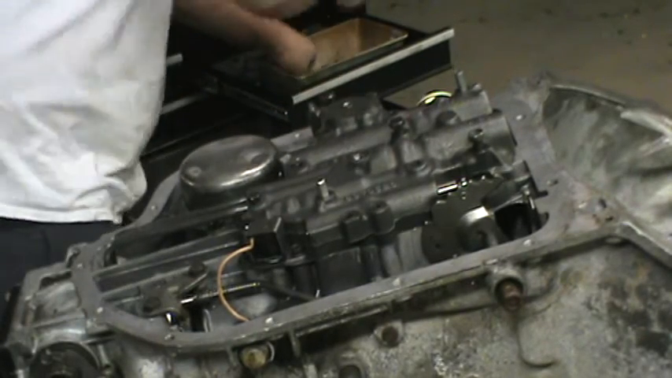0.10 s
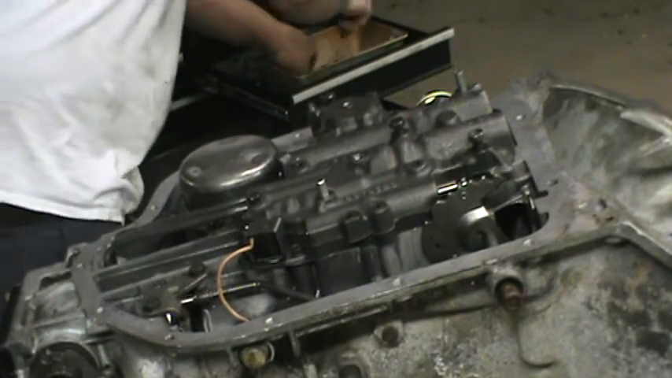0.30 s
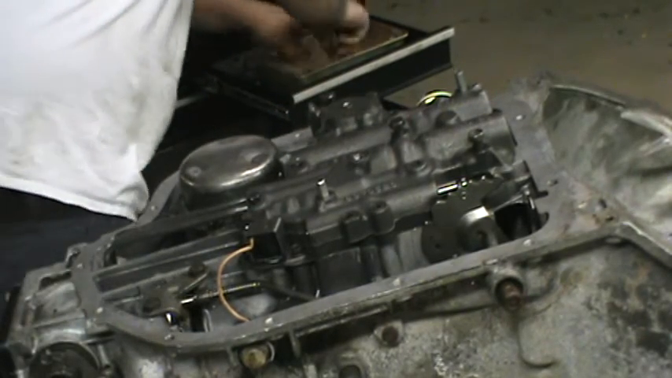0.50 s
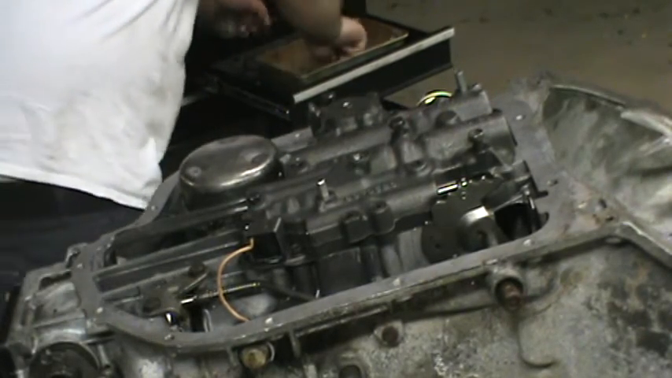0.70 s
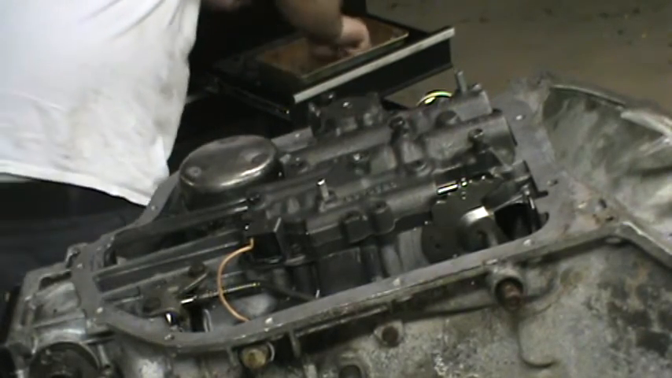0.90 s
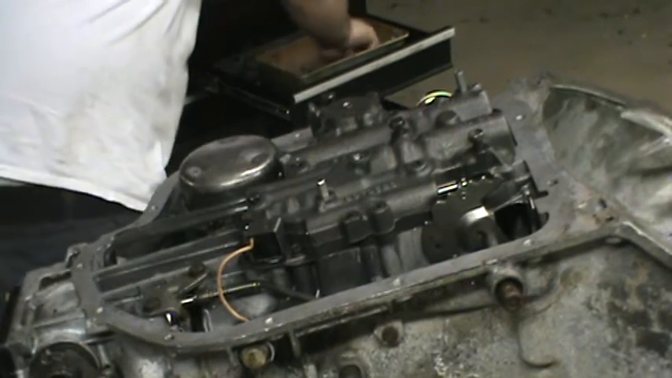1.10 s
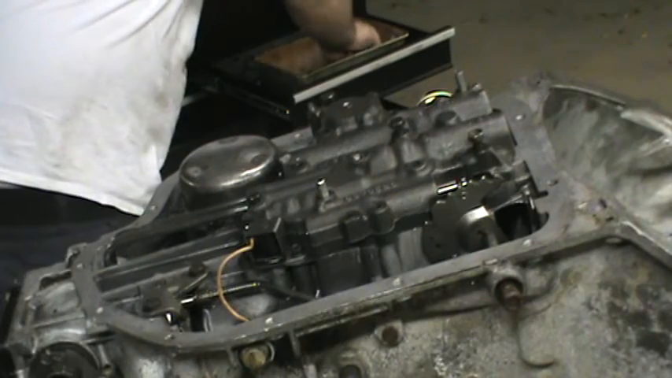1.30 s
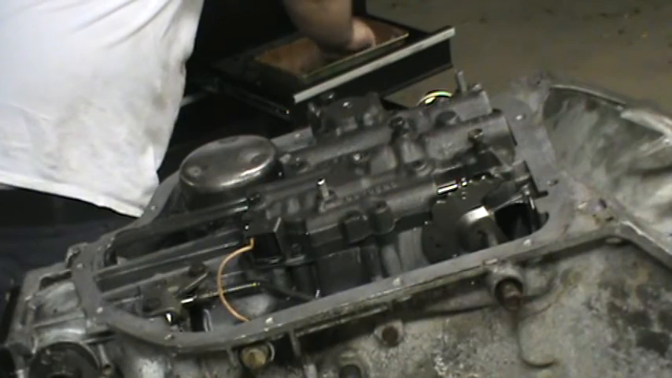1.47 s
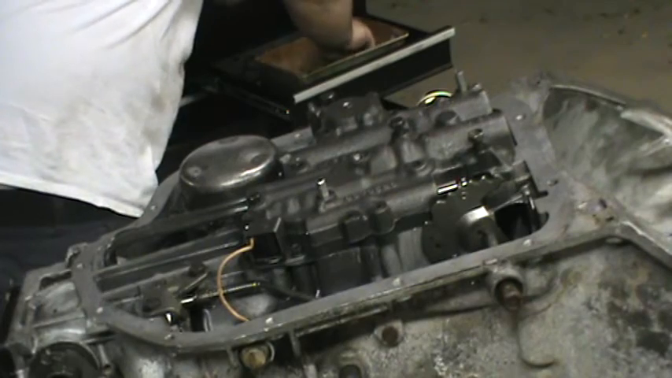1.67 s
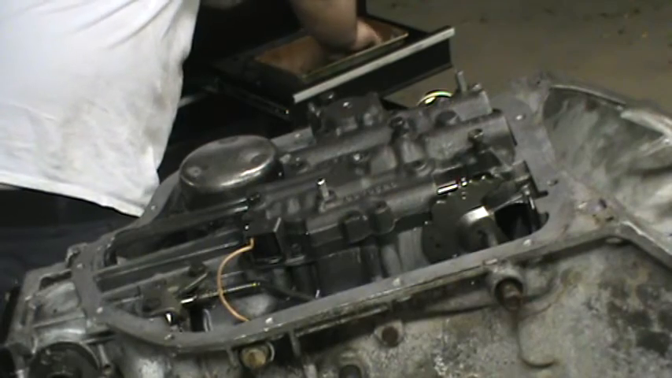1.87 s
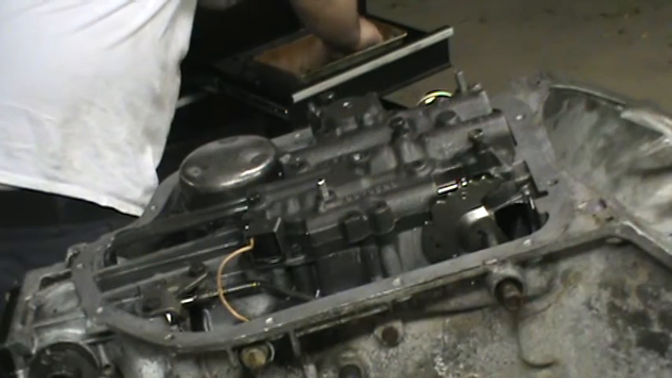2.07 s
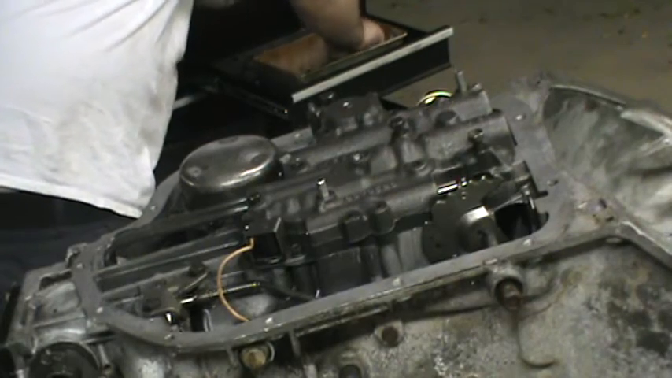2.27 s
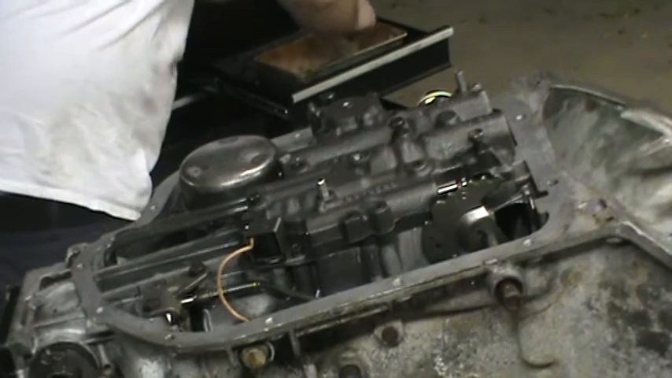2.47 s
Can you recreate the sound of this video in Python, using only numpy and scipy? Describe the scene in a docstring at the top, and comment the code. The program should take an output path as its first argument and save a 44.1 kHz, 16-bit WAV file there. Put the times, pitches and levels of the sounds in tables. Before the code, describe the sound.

Loose steel bolts stirred by fingers in a thin metal tray: light clinks and a clank first, a brief lull, then sharp knocks and gritty sliding in bursts, in a live workshop, heard fairly close in stereo.

```python
"""Loose steel bolts, rummaged by hand in a tray in a workshop.
Bolts slide as dense ringing grains, ping as beating tones, tick and knock as decaying noise bursts.
Knocks, nudges and sliding drive the tray's resonators; three wall rings are clusters of modes.
A noise-built room response answers, over quiet air noise and a faint electrical whine."""
import sys
import numpy as np
from scipy import signal
from scipy.fft import rfft, irfft
from scipy.io import wavfile

SR = 44100
rng = np.random.default_rng(int(sys.argv[2]) if len(sys.argv) > 2 else 0)


def transcribe(u):
    """Save the signal u as a 16-bit wav file named by the first command-line argument.

    u: samples, shape (n,) or (channels, n), limited to [-1, 1]; the rate is SR.
    q: integer samples, one column per channel.
    """
    v = np.clip(np.atleast_2d(u).T, -1, 1)
    q = np.round(v * 32767).astype(np.int16)
    wavfile.write(sys.argv[1], SR, q)


N = 112455
EDGE_HZ = 16150  # upper band limit


def amp(db):
    """Decibels to gain."""
    return 10 ** (np.asarray(db) / 20)


def unit(x):
    """Scales to rms 1."""
    return x / np.sqrt(np.mean(x ** 2) + 1e-20)


def read(points, hz):
    """Reads a table on a log-frequency axis."""
    f, value = np.transpose(points)
    return np.interp(np.log(hz + 1), np.log(f + 1), value)


def colour(x, points):
    """Filters with a table's spectrum, minimum phase so that nothing sounds early."""
    log_gain = np.log(amp(read(points, abs(np.fft.fftfreq(4096, 1 / SR)))))
    response = np.exp(np.conj(signal.hilbert(log_gain)))
    taps = np.fft.ifft(response).real[:2048]
    return signal.fftconvolve(x, taps)[:len(x)]


def noise(points, size=22050):
    """Coloured noise of rms 1, its level swings evened out by the root of the envelope."""
    coloured = colour(rng.standard_normal(size + 1000), points)
    z = signal.hilbert(coloured)[1000:]  # drop the filter's start
    return unit(z.real / np.sqrt(abs(z) + 1e-12))


def decay(t_s, t60_s):
    """Free decay: 60 dB down at t60_s."""
    return np.exp(-np.log(1000) * t_s / t60_s)


def strike(rise_s, t60_s, size=22050):
    """A short linear rise, then free decay."""
    t = np.arange(size) / SR
    return np.minimum(t / rise_s, 1) * decay(np.maximum(t - rise_s, 0), t60_s)


def add(mix, start_s, sound):
    """Adds a sound at start_s."""
    part = mix[max(round(start_s * SR), 0):][:len(sound)]
    part += sound[:len(part)]


def wobble(per_s, size):
    """Independent random values, per_s a second, joined by lines; rms 1."""
    knots = rng.standard_normal(2000)
    return unit(np.interp(np.arange(size) / SR * per_s, np.arange(len(knots)), knots))


def diffuse(size):
    """White noise at two microphones, nearly mono in the bass."""
    # hz, left-right correlation
    alike = [(80, 1), (170, 0.61), (700, 0.54), (1400, 0.18), (10000, 0.47)]
    a, b = rfft(rng.standard_normal((2, size)))
    same = np.clip(read(alike, np.fft.rfftfreq(size, 1 / SR)), -1, 1)
    return irfft(np.array([a, same * a + np.sqrt(1 - same ** 2) * b]), size)


def grains(per_s, ring_s, lo_hz, hi_hz):
    """Random tiny contacts of uneven size, each ringing briefly at its own pitch; rms 1."""
    spread_db = 3.6
    out = np.zeros(N)
    t = np.arange(0, 10 * ring_s, 1 / SR)
    for when, pitch, chance, turn in rng.random((round(per_s * N / SR), 4)):
        hz = lo_hz + pitch * (hi_hz - lo_hz)
        level_db = spread_db * min(-np.log(1 - chance), 4)
        ring = np.exp(-t / ring_s) * np.sin(2 * np.pi * (hz * t + turn))
        add(out, when * N / SR, amp(level_db) * ring)
    return unit(out)


def sliding():
    """Dense slips and a sparser high rattle follow the fingers' push and bunch as the bolts jostle."""
    # push of the fingers: time_s, level_db
    push = [(0, -51.5), (.09, -58.5), (.15, -66.5), (.21, -63.5), (0.231, -47), (.31, -51), (.39, -47),
            (.47, -57), (.65, -61), (0.699, -39), (.73, -45), (.80, -42.5), (.86, -39.5), (.93, -44),
            (.965, -51), (1.04, -56), (1.075, -46), (1.12, -44), (1.15, -52), (1.19, -48.5), (1.215, -53.5),
            (1.276, -44), (1.34, -57.5), (1.53, -57.5), (1.6, -54.5), (1.75, -49.5), (1.86, -50),
            (1.89, -37), (1.94, -49), (2.02, -49), (2.12, -59.5), (2.17, -50), (2.201, -38), (2.235, -44),
            (2.275, -41), (2.311, -51.5), (2.4, -65.5)]
    # slip spectrum: hz, gain_db
    scrape_spectrum = [(110, -42.5), (330, -6.5), (520, -3), (850, 0.5), (1500, -0.5), (2300, -4),
                       (4500, -8), (7000, -9.5), (11300, -9), (16000, -23)]
    rattle_db, jostle_per_s, jostle_db = -10, 70, 1.3
    slips = grains(per_s=7000, ring_s=.0006, lo_hz=0, hi_hz=EDGE_HZ)
    scrape = unit(colour(slips, scrape_spectrum))
    rattle = amp(rattle_db) * grains(per_s=260, ring_s=.0013, lo_hz=9300, hi_hz=12000)
    push_db = np.interp(np.arange(N) / SR, *np.transpose(push))
    return (scrape + rattle) * amp(push_db + jostle_db * wobble(jostle_per_s, N))


def tray(x, direct_db=-2, ring_db=-3):
    """Resonators ring beside the direct contact; the moving hand favours now one, now another."""
    # tray resonances: pitch_hz, width_hz, level_db (relative)
    resonances = [(385.4, 35, 5.5), (660, 37, 4.5), (763, 12, 1.5), (874.4, 35, 6), (948, 25, -14),
                  (1024, 18, -6), (1290, 32, -5.5), (1557, 70, -3)]
    hand_per_s, hand_db = 8, 2.5
    out = amp(direct_db) * x
    for hz, width_hz, db in resonances:
        r = np.exp(-np.pi * width_hz / SR)
        pole = r * np.exp(2j * np.pi * hz / SR)
        drive = x * amp(hand_db * wobble(hand_per_s, N))
        ring = 2 * signal.lfilter([1 - r], [1, -pole], drive).real
        out = out + amp(db + ring_db) * ring
    return out


def room(x):
    """Early reflections from nearby metal plus the workshop's tail, decaying per frequency band."""
    # tail decay: hz, t60_s
    room_t60 = [(200, 0.87), (1000, 0.51), (3000, 0.5), (6000, 0.52), (10000, 0.34), (16000, 0.14)]
    # tail spectrum: hz, gain_db
    room_level = [(200, -11), (500, -13), (1200, -8.5), (3500, -3), (7000, -6.5), (10000, -6.5),
                  (16000, -16)]
    early_db, early_rise_s, early_t60_s, tail_rise_s = -9, 0.0053, 0.081, 0.0022
    hz, t, z = signal.stft(diffuse(SR), SR, nperseg=256)
    fade = decay(t, read(room_t60, hz)[:, None]) * np.minimum(t / tail_rise_s, 1)
    tails = signal.istft(z * fade, SR, nperseg=256)[1][:, :SR]
    earlies = diffuse(SR) * strike(early_rise_s, early_t60_s, size=SR)
    echoes = []
    for tail, early in zip(tails, earlies):
        late = colour(tail / np.linalg.norm(tail), room_level)
        echoes.append(late + amp(early_db) * early / np.linalg.norm(early))
    return signal.fftconvolve(x[None], np.array(echoes), axes=1)[:, :N]


def air():
    """Steady shaped room noise and a thin electrical whine, a sine."""
    # air spectrum: hz, gain_db (relative)
    air_spectrum = [(25, 1.5), (40, -1.5), (60, -0.5), (100, -3), (220, -3.5), (600, -7.5), (1100, -13),
                    (3400, -19.5), (9000, -17.5), (16000, -20.5)]
    air_rms_db, whine_hz, whine_rms_db = -56.5, 15734, -73
    gain = amp(read(air_spectrum, np.fft.rfftfreq(N, 1 / SR)))
    hiss = irfft(rfft(diffuse(N)) * gain, N)
    whine = np.sin(2 * np.pi * whine_hz * np.arange(N) / SR)
    return amp(air_rms_db) * unit(hiss) + amp(whine_rms_db) * unit(whine)


def knocks():
    """A brief crack, whose top dies first, with the tray's clank and low thud swelling behind."""
    # bolts on the tray: start_s, thud_db, clank_db, crack_db, rise_s, length_factor (scales t60)
    blows = [(.026, -57, -51.5, -74, 0.0041, 5.3), (.246, -69, -49.5, -59, .0045, 2.4),
             (.332, -74, -44.5, -43, 0.0042, 4), (.365, -44, -34, -34.5, 0.0004, 1.52),
             (.682, -54.5, -63, -38.5, 0.0053, 8), (0.8164, -42, -30, -23, 0.00012, 0.7),
             (0.867, -40.5, -43, -53, 0.0046, 0.92), (.897, -59, -42, -63, 0.0021, 3.4),
             (.981, -43.5, -39.5, -64, 0.0028, 0.78), (1.116, -54, -45.5, -44, .0014, 0.82),
             (1.273, -46, -38.5, -37, 0.0011, 1.02), (1.292, -68, -41.5, -64, .0018, 2),
             (1.59, -71, -43.5, -56, 0.0011, 1.06), (1.623, -34.5, -30, -31, 0.00012, 0.93),
             (1.658, -43, -44.5, -62, 0.0037, 0.93), (1.894, -52, -30.5, -24.5, 0.00057, 0.94),
             (1.929, -55, -42, -46, .0017, 2.3), (2.078, -65, -50.5, -45, 0.0026, 0.73),
             (2.195, -66, -58, -31.5, 0.0016, 1.7), (2.273, -78, -43, -38, 0.00087, 0.48)]
    # noise spectra: hz, gain_db
    thud_spectrum = [(140, -42), (270, -8), (370, 0), (560, -1), (800, -5.5), (2000, -60)]
    clank_spectrum = [(300, -14.5), (550, -15), (700, -3.5), (1000, -3.5), (1400, -6.5), (2000, -12),
                      (4000, -19.5), (8000, -34.5), (16000, -37)]
    crack_spectrum = [(600, -25), (1800, -2), (4000, 0), (6500, -3), (9000, -4), (11500, -5), (13500, -11),
                      (16000, -19)]
    thud_base_t60_s, clank_base_t60_s, crack_base_t60_s = .11, .11, .045
    thud_swell_s, clank_swell_s = 0.00095, 0.0033  # the sheet takes a moment to start moving
    snap_hz, snap_t60_share = 7000, .45
    out = np.zeros(N)
    for start_s, thud_db, clank_db, crack_db, rise_s, length in blows:
        thud_level = strike(rise_s + thud_swell_s, thud_base_t60_s * length)
        add(out, start_s, amp(thud_db) * noise(thud_spectrum) * thud_level)
        clank_level = strike(rise_s + clank_swell_s, clank_base_t60_s * length)
        add(out, start_s, amp(clank_db) * noise(clank_spectrum) * clank_level)
        crack = amp(crack_db) * noise(crack_spectrum)
        t60_s = crack_base_t60_s * length
        dull = signal.filtfilt(*signal.butter(2, snap_hz, fs=SR), crack)
        snap = (crack - dull) * strike(rise_s, snap_t60_share * t60_s)
        add(out, start_s, dull * strike(rise_s, t60_s) + snap)
    return out


def pings():
    """Bolt on bolt: beating tones splash at the strike, buzz against neighbours and are soon choked."""
    # start_s, pitch_hz, level_db, rise_s, length_s (60 dB down)
    hits = [(0.03, 2253, -52, 0.0046, 0.06), (0.075, 8910, -44.5, 0.01, 0.091),
            (0.2472, 9817, -21, 0.0046, 0.029), (.249, 9539, -44, .0025, 0.051),
            (.268, 9806, -37, 0.017, 0.15), (0.335, 9316, -52.5, 0.045, 0.15),
            (0.551, 9620, -52, .002, 0.042), (.695, 8736, -32, 0.0035, 0.15),
            (0.719, 9720, -35, .007, 0.049), (0.929, 9960, -27.5, 0.0011, 0.017),
            (.978, 10200, -28, .0017, 0.0064), (1.077, 8701, -40, .004, 0.068),
            (1.0828, 8720, -29, 0.0055, 0.076), (1.651, 8740, -41.5, .0038, 0.043),
            (1.846, 8718, -50.5, 0.003, 0.05), (2.263, 11300, -34, .003, 0.0055)]
    pair_hz, pair_db = 55, -17
    chatter_hz, chatter = 130, .3  # depth: share of level, and radians
    buzz_db, buzz_spread, splash_t60_s = -14, 1.25, .06
    out = np.zeros(N)
    for start_s, hz, db, rise_s, length_s in hits:
        t = np.arange(0, rise_s + length_s, 1 / SR)
        choke = np.exp(-np.log(1000) * (np.maximum(t - rise_s, 0) / length_s) ** 2)
        level = np.minimum(t / rise_s, 1) * choke
        swing = chatter * wobble(chatter_hz, len(t)) * np.minimum(t / splash_t60_s, 1)
        shift = chatter * wobble(2 * chatter_hz, len(t))
        main = (1 + swing) * np.sin(2 * np.pi * hz * t + shift)
        second_hz = hz - pair_hz * rng.uniform(0.54, 2.45)
        second = amp(pair_db) * np.sin(2 * np.pi * (second_hz * t + rng.random()))
        band = [(hz / buzz_spread, -28), (hz, 0), (hz * buzz_spread, -40)]
        buzz = amp(buzz_db) * noise(band)[:len(t)]
        splash = buzz * decay(t, splash_t60_s)
        add(out, start_s, amp(db) * (level * (main + second + buzz) + splash))
    return out


def ticks():
    """Small dry contacts between bolts: short bursts of high noise."""
    # start_s, level_db
    contacts = [(0.076, -46), (0.247, -43), (0.3324, -33), (0.66, -49), (.694, -35.5), (0.766, -32),
                (.917, -35), (.928, -37), (1.0697, -34.5), (1.161, -43), (1.187, -45), (1.589, -42),
                (1.6545, -41), (1.746, -39.5), (1.8004, -42.5), (1.89, -41), (2.062, -45), (2.075, -40),
                (2.158, -42), (2.188, -38), (2.203, -32.5), (2.27, -39)]
    # noise spectrum: hz, gain_db
    tick_spectrum = [(2000, -29), (6500, -27), (8500, -11.5), (10300, -3.5), (11500, -10.5), (13000, -12),
                     (16000, -26)]
    out = np.zeros(N)
    for start_s, db in contacts:
        add(out, start_s, amp(db) * noise(tick_spectrum) * strike(rise_s=0.00027, t60_s=.024))
    return out


def nudges():
    """Soft pushes on the tray's bottom swell and fade, each note sagging as the pressure eases."""
    # start_s, level_db, length_s, pitch_hz (mid-note)
    pushes = [(0.249, -42, 0.017, 897), (.339, -51, 0.081, 858), (.506, -44, .024, 912),
              (0.661, -47, 0.014, 860), (0.673, -38, 0.028, 880), (1.895, -31, 0.014, 780),
              (2.079, -43.5, 0.014, 880)]
    # noise spectrum: hz, gain_db
    nudge_spectrum = [(200, -25), (310, -8.5), (450, -17.5), (680, -7), (900, -4), (1200, -15.5),
                      (2500, -29)]
    noise_gain, sag = .5, .05  # sag: share of the pitch over the note
    out = np.zeros(N)
    for start_s, db, length_s, hz in pushes:
        u = np.arange(0, length_s, 1 / SR) / length_s
        sagging_hz = hz * (1 + sag * (.5 - u))
        tone = np.sin(2 * np.pi * np.cumsum(sagging_hz) / SR)
        note = tone + noise_gain * noise(nudge_spectrum)[:len(u)]
        add(out, start_s, amp(db) * np.sin(np.pi * np.sqrt(u)) * note)
    return out


def wall():
    """Three rings of the side wall, each a cluster of decaying modes around a centre pitch."""
    # start_s, level_db, rise_s, centre_hz
    wall_rings = [(.378, -43, .0076, 1100), (1.898, -41, .0072, 1230), (1.929, -40, .003, 1340)]
    # mode pitches: hz
    modes = [1013, 982, 1085, 1170, 1210, 1313, 1420, 1422, 1560]
    t60_s, spread_hz = .22, 220
    out = np.zeros(N)
    for start_s, db, rise_s, centre_hz in wall_rings:
        level = strike(rise_s, t60_s)
        t = np.arange(len(level)) / SR
        for hz in modes:
            share = np.exp(-((hz - centre_hz) / spread_hz) ** 2)
            tone = np.sin(2 * np.pi * (hz * t + rng.random()))
            add(out, start_s, amp(db) * share * level * tone)
    return out


def scene():
    """The tray stands slightly to the right in the workshop; its sound is thin, with little bass."""
    left_db, tray_low_hz = -1, 252  # high-pass on tray, bolts and their echo
    bolts_wet_db = -2.5  # pings and ticks sound a little drier than the tray
    body = tray(knocks() + nudges() + sliding()) + wall()
    clinks = pings() + ticks()
    echo = room(body + amp(bolts_wet_db) * clinks)
    heard = amp([[left_db], [0]]) * (body + clinks + echo)
    high_pass = signal.butter(3, tray_low_hz, "high", fs=SR, output="sos")
    return signal.sosfilt(high_pass, heard) + air()


def record(dry):
    """The recorder's band limit: a linear-phase low-pass."""
    taps = signal.firwin(511, EDGE_HZ, window=("kaiser", 9), fs=SR)
    return signal.oaconvolve(dry, taps[None], "same")


dry = scene()
out = record(dry)
transcribe(out)
```